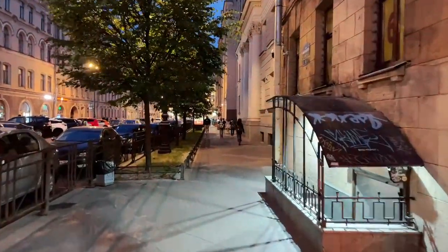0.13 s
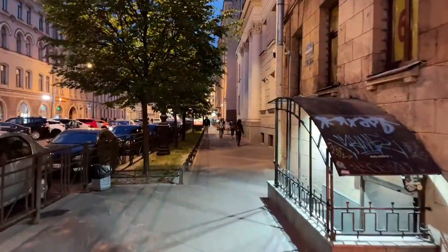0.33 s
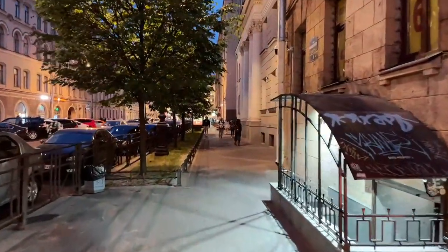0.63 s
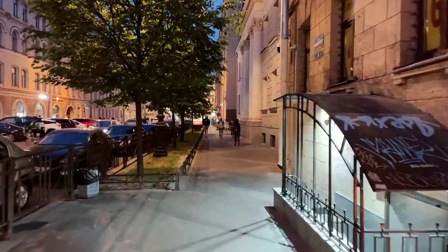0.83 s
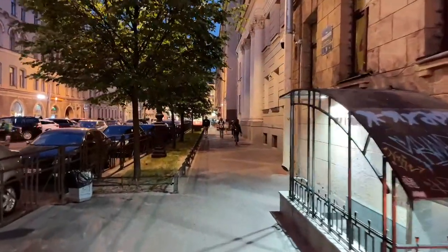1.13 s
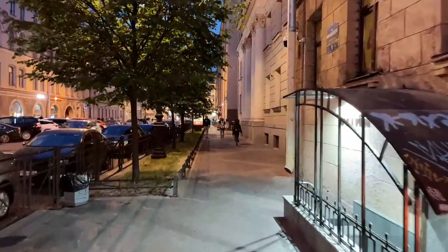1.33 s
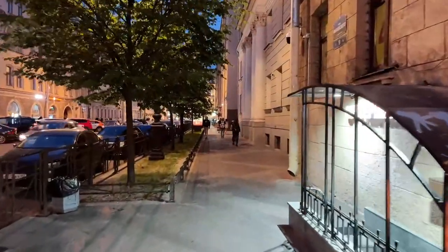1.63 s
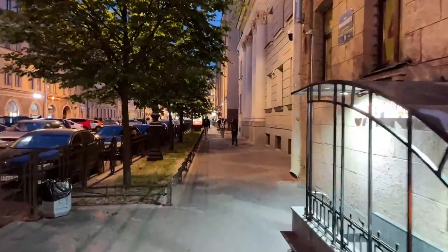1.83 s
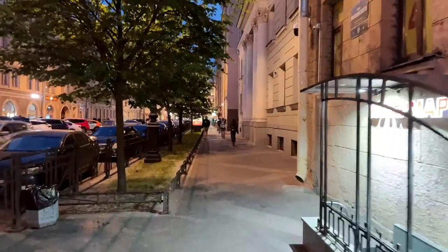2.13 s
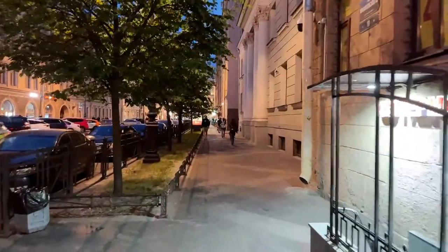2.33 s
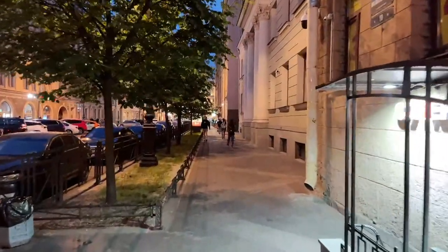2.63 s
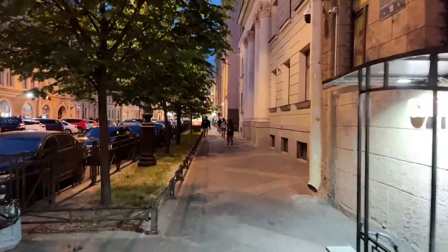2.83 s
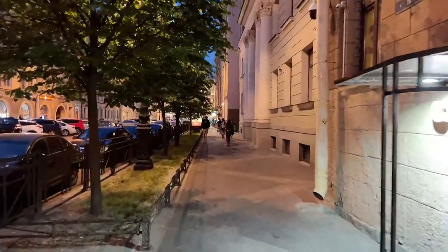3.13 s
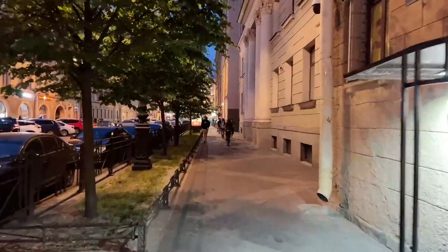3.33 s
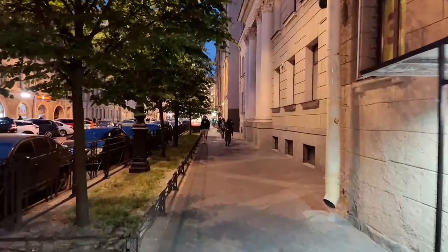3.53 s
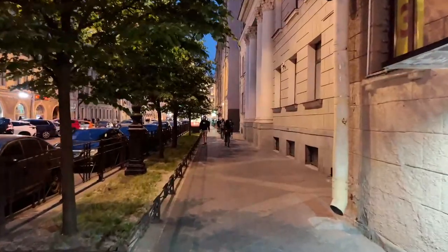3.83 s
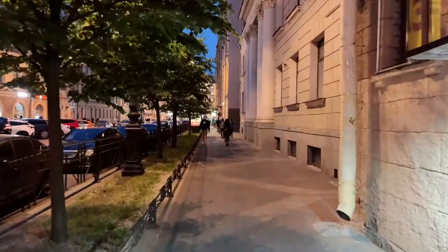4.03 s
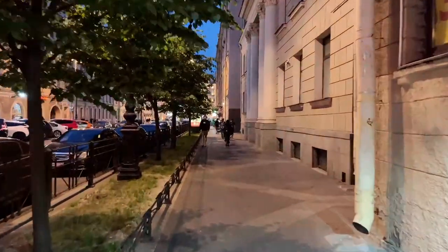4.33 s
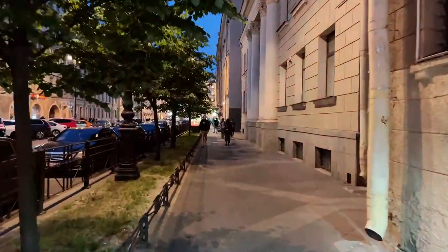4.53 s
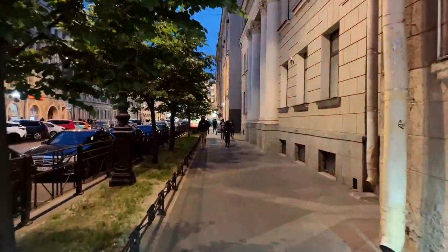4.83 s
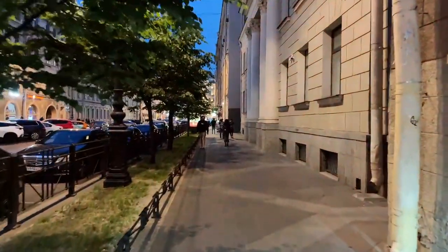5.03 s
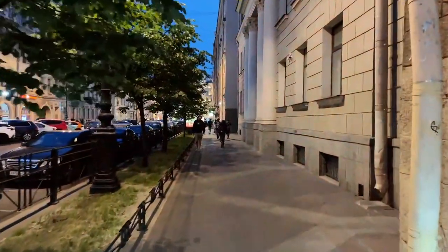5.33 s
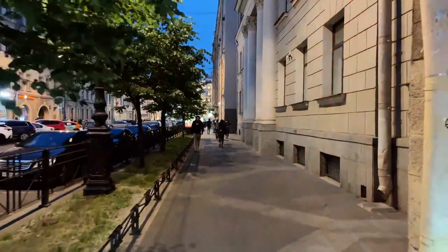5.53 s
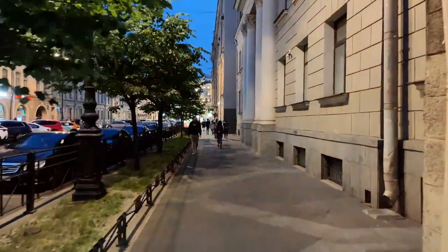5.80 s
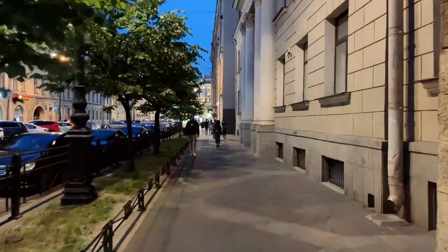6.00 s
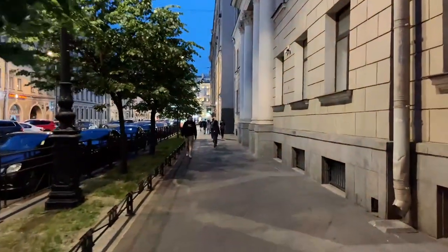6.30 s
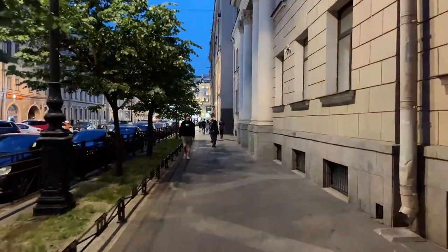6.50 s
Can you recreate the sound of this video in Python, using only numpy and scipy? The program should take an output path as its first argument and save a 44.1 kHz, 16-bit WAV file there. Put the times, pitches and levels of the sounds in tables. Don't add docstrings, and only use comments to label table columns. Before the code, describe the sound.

A pavement beside a busy street, in mono, with deep far traffic rumble, mid tyre roar and soft hiss throughout. From 0 to 1 s a car drones past with a low rising pitch, swelling around 0.7 s; a faint scuff and a dull distant knock are tucked in. At about 1.1 s a lorry-like engine pulls away, its deep buzzing growl climbing to its loudest near 1.8 s, with breathy intake hiss. It drops at about 2.05 s, climbs again in second until 3.1 s, then coasts, sagging in pitch to 4.1 s. Third gear rises more softly, swelling near 5.5 s, then fades away by 6.3 s. Small gritty shoe scuffs come around 3.6 to 4.6 s, with a dull knock at 4.5 s. Wind rumbles and thumps the microphone at 3.5 to 4 s and, harder, from 5.6 to 6.5 s.

```python
import sys
import numpy as np
from scipy import signal
from scipy.fft import rfft, irfft, next_fast_len
from scipy.io import wavfile

SR = 44100
rng = np.random.default_rng(int(sys.argv[2]) if len(sys.argv) > 2 else 0)


def rack_gain(trim_db):
    fader = np.asarray(trim_db, float)
    return 10 ** (fader / 20)


def persist_wave(psi):
    counts = np.round(np.clip(psi, -1, 1) * 32767).astype(np.int16)
    wavfile.write(sys.argv[1], SR, np.atleast_2d(counts).T)


N = 293706

# time in seconds, load in dB.
LOAD = [(0.0, -73.5), (0.2, -70.5), (0.35, -73), (1.09, -72), (1.37, -63.5), (2.08, -66), (2.35, -64),
        (3.11, -68), (3.76, -70.5), (3.84, -72.5), (3.86, -67), (4.21, -69.5), (4.32, -69.5), (4.38, -70),
        (4.67, -70), (4.82, -71), (6.55, -72), (6.66, -68)]
# time in seconds, level in dB.
TRAFFIC = [(0.0, -42.5), (0.17, -42.5), (1.19, -43), (1.45, -41), (2.59, -41.5), (2.76, -43), (4.06, -44.5),
           (5.1, -42), (5.73, -43), (6.21, -42), (6.66, -41)]


def rms_one(x):
    return x / np.sqrt(np.mean(x ** 2) + 1e-20)


def in_time(rows):
    s, *columns = np.transpose(rows)
    return [np.interp(np.arange(N) / SR, s, c) for c in columns]


def drift(rate_hz):
    hop = 40
    r = np.exp(-2 * np.pi * hop * rate_hz / SR)
    noise = rng.standard_normal(N // hop + 2002)
    slow = signal.lfilter([1], [1, -2 * r, r * r], noise)[2000:]
    return np.interp(np.arange(N) / hop, np.arange(len(slow)), rms_one(slow))


def swell_db(peak_s, length_s, peak_db):
    return np.maximum(peak_db - 24 * ((np.arange(N) / SR - peak_s) / length_s) ** 2, -150)


def coloured(spectrum, patchy_db, rate_hz):
    hz, level_db = np.transpose(spectrum)
    bands_per_octave = 5
    size = next_fast_len(N)
    f = np.fft.rfftfreq(size, 1 / SR) + 1e-3
    gain = rack_gain(np.interp(np.log(f), np.log(hz), level_db, left=-99, right=-99))
    full = rfft(rng.standard_normal(size)) * gain
    place = bands_per_octave * np.log2(f / hz[0])
    top_hz = hz[level_db > -60].max()
    together = drift(rate_hz)
    out = 0
    for k in range(int(bands_per_octave * np.log2(top_hz / hz[0])) + 2):
        band = irfft(full * np.clip(1 - np.abs(place - k), 0, 1), size)[:N]
        out = out + band * rack_gain(patchy_db * (0.079 * together + drift(rate_hz)))
    return rms_one(out)


def narrow_noise(hz, level_db, width_hz, flutter_db):
    turn = 2 * np.pi * hz * np.arange(N) / SR
    low_pass = signal.butter(2, width_hz / 2, fs=SR, output="sos")
    a, b = signal.sosfilt(low_pass, rng.standard_normal((2, N)))
    return rack_gain(level_db + flutter_db * drift(6)) * rms_one(a * np.cos(turn) + b * np.sin(turn))


def engine(rows, second_db, third_db, fade_db_per_s, wobble, flutter_db):
    # frequency in Hz, gain in dB.
    pipe = [(80, -18), (100, -10), (120, -6), (138, -12), (160, -10.5), (185, -25.5), (200, -27),
            (220, -33)]
    firing_hz, level_db = in_time(rows)
    pipe_hz, pipe_db = np.transpose(pipe)
    t = np.arange(N) / SR
    start_s, end_s = rows[0][0], rows[-1][0]
    tail_db = fade_db_per_s * (t - start_s).clip(0, end_s - start_s)
    levels_db = [level_db]
    for order, order_db in ((2, second_db), (3, third_db)):
        reflections_db = 1.5 * drift(5)
        follow_db = 0.25 * (level_db + 20)
        through_pipe_db = np.interp(order * firing_hz, pipe_hz, pipe_db)
        levels_db.append(order_db - tail_db + reflections_db + follow_db + through_pipe_db)
    turn = 2 * np.pi * np.cumsum(firing_hz * (1 + wobble * drift(6))) / SR
    lines = 0
    for order, db in enumerate(levels_db, 1):
        lines = lines + rack_gain(db + flutter_db * drift(15.6)) * np.sin(order * turn + 6 * rng.random())
    fade_in = np.clip((t - start_s) / .04 + (start_s < .01), 0, 1)
    fade_out = np.clip((end_s - t) / .04, 0, 1)
    return np.sqrt(2) * fade_in * fade_out * lines


def early_car():
    # time in seconds, firing rate in Hz, firing level in dB.
    car = [(0.0, 56.1, -32.5), (0.5, 64.3, -31.5), (0.6, 66.3, -47), (0.69, 69.4, -21), (0.97, 74.7, -41.5),
           (1.05, 75, -59)]
    return engine(car, second_db=-37.5, third_db=-53, fade_db_per_s=-1.0, wobble=.006, flutter_db=1.0)


def street():
    # frequency in Hz, density in dB per Hz.
    deep_spectrum = [(18, -55), (30, -17), (41, -6.5), (54, 5), (70, -2), (86, -0.5), (102, -5.5),
                     (170, -16), (220, -52), (370, -120)]
    rumble_spectrum = [(88, -28.5), (150, -0.5), (226, -2), (269, -4), (500, -14), (650, -34), (1100, -120)]
    roar_spectrum = [(260, -31.5), (450, -8), (618, -6), (844, -4), (1700, -18), (2210, -23.5),
                     (3740, -120)]
    hiss_spectrum = [(1590, -33.5), (2700, -2.5), (4300, -8), (5590, -29), (9460, -120)]
    # peak in seconds, length in seconds, centre in Hz, peak level in dB.
    treads = [
        (1.393, 0.91, 483.7, -42.5),
        (3.6, 0.93, 1509, -57),
        (4.703, 0.38, 1444, -58),
        (5.0, 0.35, 551, -44.5),
        (5.4, 0.63, 1410, -57),
        (5.997, .5, 1395, -56),
        (6.6, 1, 1355, -53.5),
    ]
    (roar_db,), (load_db,) = in_time(TRAFFIC), in_time(LOAD)
    deep_db = -36 + 5 * np.minimum(np.arange(N) / SR / 2.3, 1)
    rumble_db = -37 + 0.7 * (roar_db - roar_db.mean())
    hiss_db = -56.5 + 0.52 * (load_db - load_db.mean())
    out = rack_gain(deep_db) * coloured(deep_spectrum, patchy_db=3.5, rate_hz=4.3)
    out += rack_gain(rumble_db) * coloured(rumble_spectrum, patchy_db=1.5, rate_hz=6.1)
    out += rack_gain(roar_db + 0.05) * coloured(roar_spectrum, patchy_db=1.5, rate_hz=7.8)
    out += rack_gain(hiss_db) * coloured(hiss_spectrum, patchy_db=1.0, rate_hz=2.9)
    for peak_s, length_s, hz, peak_db in treads:
        out += narrow_noise(hz, swell_db(peak_s, length_s, peak_db), width_hz=250, flutter_db=3.5)
    return out


def air_noise():
    # frequency in Hz, density in dB per Hz.
    fan_spectrum = [(940, -30.5), (1600, -5.5), (2230, -3.5), (2800, -11.5), (3640, -26), (6160, -120)]
    intake_spectrum = [(2470, -30), (4200, -1), (5030, 0.5), (6020, -3), (7250, -8.5), (7700, -18),
                       (10000, -54.5), (16900, -120)]
    top_spectrum = [(5470, -29), (9300, 3), (9910, -4.5), (11200, -1), (13100, -6), (14200, -9.5)]
    # peak in seconds, length in seconds, centre in Hz, peak level in dB.
    whistles = [
        (1.1, .1, 4600, -61),
        (1.47, .35, 4800, -59),
        (2.4, .35, 5300, -58.5),
    ]
    load_db, road_db = (c - c.mean() for c in in_time(LOAD) + in_time(TRAFFIC))
    facing_db = 3.5 * rack_gain(swell_db(2.83, 1.0, 0))
    fan_db = -53.5 + facing_db + 0.34 * load_db + 0.49 * road_db
    out = rack_gain(fan_db) * coloured(fan_spectrum, patchy_db=1.0, rate_hz=8.5)
    out += rack_gain(-60 + 0.7 * load_db) * coloured(intake_spectrum, patchy_db=2.0, rate_hz=3.3)
    out += rack_gain(-67 + 1.01 * load_db) * coloured(top_spectrum, patchy_db=2.3, rate_hz=6.5)
    for peak_s, length_s, hz, peak_db in whistles:
        out += narrow_noise(hz, swell_db(peak_s, length_s, peak_db), width_hz=650, flutter_db=3.0)
    return out


def exhaust_swells():
    # peak in seconds, length in seconds, pitch at peak in Hz, climb in Hz per s, peak level in dB.
    swells = [
        (0.25, 0.63, 88.8, 25, -36.5),
        (0.945, 0.35, 111.5, 28, -38),
        (1.33, 0.24, 166.2, 60, -32),
        (2.203, .45, 74.8, 14, -24),
        (2.501, 0.21, 86, 0.1, -35),
        (2.55, .45, 195.7, 45, -37.5),
        (3.96, 0.32, 69.8, 0.1, -27.5),
        (4.398, 0.44, 213.2, 30, -43),
        (6.321, 0.41, 56.96, 20, -26.5),
    ]
    out = 0
    for peak_s, length_s, hz, climb, peak_db in swells:
        t = np.arange(N) / SR - peak_s
        level = rack_gain(swell_db(peak_s, length_s, peak_db + 2) + 0.87 * drift(13))
        out = out + level * np.sin(2 * np.pi * (hz + climb * t / 2) * t)
    return out


def pavement():
    # start in seconds, peak level in dB, centre in Hz, decay in seconds.
    scuffs = [(0.09, -64, 11200, .07), (0.177, -42, 3500, 0.0053), (3.603, -43, 4023, .008),
              (3.615, -47, 4317, .015), (3.77, -65, 12300, .02), (3.86, -52.5, 4546, .06),
              (3.864, -60, 13200, 0.059), (4.075, -60, 5950, 0.027), (4.274, -49, 6400, .035),
              (4.276, -61, 12800, 0.05), (4.29, -54, 3820, 0.028), (4.592, -46, 3542, .008),
              (4.64, -55, 11450, .018), (6.048, -54, 4030, .03)]
    # start in seconds, peak level in dB, pitch in Hz, t60 in seconds.
    knocks = [
        (0.504, -35, 467, 0.74),
        (.54, -33, 439, 0.2),
        (1.466, -43.5, 1890, 0.21),
        (4.53, -28, 507, 0.16),
    ]
    out = np.zeros(N)
    t = np.arange(int(.2 * SR)) / SR
    for start_s, peak_db, hz, decay_s in scuffs:
        grit = rng.standard_normal(len(t)) * np.minimum(t / 0.0025, 1) * np.exp(-t / decay_s)
        edges_hz = [max(hz - 1300, 200), min(hz + 1300, 16000)]
        band = signal.butter(3, edges_hz, "band", fs=SR, output="sos")
        at = round(start_s * SR)
        out[at:at + len(t)] += 2 * rack_gain(peak_db) * signal.sosfilt(band, grit)
    t = np.arange(int(.3 * SR)) / SR
    for start_s, peak_db, hz, t60_s in knocks:
        at = round(start_s * SR)
        ring = rack_gain(peak_db - 60 * t / t60_s) * np.sin(2 * np.pi * hz * t)
        out[at:at + len(t)] += np.minimum(t / .02, 1) * ring
    return out


def lorry():
    # time in seconds, firing rate in Hz, firing level in dB.
    first = [(1.12, 40.94, -44), (1.24, 46.9, -28), (1.352, 54.6, -15.5), (1.444, 59.7, -14), (1.6, 67.2, -11),
             (1.792, 72, -9), (1.9, 68.4, -12), (1.936, 68.3, -9.5), (2.07, 50.5, -33)]
    second = [(2.05, 53.2, -17), (2.08, 52.1, -25.5), (2.296, 62.6, -14), (2.43, 63.67, -18.5),
              (2.754, 71.74, -17), (2.954, 72.4, -17.5), (2.998, 72.7, -23), (3.124, 66.4, -23.5),
              (3.16, 67.9, -38)]
    coast = [(3.14, 61.7, -23), (3.16, 64.3, -33), (3.254, 70.5, -24), (3.31, 72.2, -27.5), (3.65, 69.06, -24.5),
             (3.99, 52.55, -28), (4.026, 51.07, -21), (4.106, 49.8, -37), (4.12, 50.0, -43)]
    third = [(4.1, 50.06, -25), (4.112, 50.2, -28.5), (4.314, 51.2, -22.5), (4.406, 53.3, -29),
             (4.498, 53.4, -18.5), (5.02, 61.2, -21), (5.174, 62.4, -27), (5.456, 66.1, -18), (5.55, 68.6, -13.5)]
    # time in seconds, firing rate in Hz, firing level in dB.
    leaving = [(5.53, 67.7, -17.5), (5.864, 72.25, -27), (5.89, 71, -21), (6.024, 74.1, -20.5),
               (6.108, 71.8, -33), (6.134, 71.9, -20.5), (6.3, 76.3, -41)]
    out = engine(first, second_db=-14.5, third_db=-27, fade_db_per_s=6.5, wobble=.002, flutter_db=0.46)
    out += engine(second, second_db=-20, third_db=-16, fade_db_per_s=10.5, wobble=0.0044, flutter_db=2.3)
    out += engine(coast, second_db=-36.5, third_db=-46, fade_db_per_s=-20.5, wobble=0.0049, flutter_db=2.5)
    out += engine(third, second_db=-17, third_db=-28.5, fade_db_per_s=6.0, wobble=.002, flutter_db=0.8)
    out += engine(leaving, second_db=-22, third_db=-30, fade_db_per_s=2.5, wobble=0.0033, flutter_db=3.0)
    return out


def wind():
    # peak in seconds, length in seconds, peak level in dB.
    gusts = [
        (3.57, 0.24, -28),
        (3.915, 0.35, -29.5),
        (5.712, 0.3, -29.5),
        (6.146, 0.13, -24.5),
        (6.42, .1, -31),
        (6.578, .15, -36),
    ]
    # centre in seconds, peak level in dB, swing in Hz.
    thumps = [(3.56, -20, 70), (3.852, -19, 120), (4.04, -17, 69.9), (5.589, -17.5, 122.6),
              (5.616, -11, 113), (5.672, -14, 125), (5.723, -22, 91), (5.793, -20, 99.5), (5.881, -20, 108),
              (6.098, -25, 110), (6.136, -20, 85), (6.158, -24, 100), (6.184, -25, 80), (6.339, -25, 109.7),
              (6.424, -15.5, 93)]
    level = sum(rack_gain(swell_db(*gust)) for gust in gusts)
    lumps = rng.standard_normal(N) * rack_gain(2.5 * drift(18))
    band = signal.butter(2, [45, 110], "band", fs=SR, output="sos")
    out = level * rms_one(signal.sosfilt(band, lumps))
    half = int(.03 * SR)
    t = np.arange(-half, half) / SR
    for centre_s, peak_db, hz in thumps:
        swing = np.sin(2 * np.pi * hz * t) * np.exp(-(1.7 * hz * t) ** 2)
        snap = np.cos(2 * np.pi * 2.0 * hz * t) * np.exp(-(3.2 * hz * t) ** 2)
        at = round(centre_s * SR) - half
        out[at:at + len(t)] += 1.23 * rack_gain(peak_db) * (swing + 0.36 * snap)
    return out


def scene():
    engines = early_car() + exhaust_swells() + lorry()
    return (engines + street() + air_noise() + pavement() + wind())[None, :]


def band_limit(x):
    return signal.sosfilt(signal.butter(12, 14370, fs=SR, output="sos"), x)


def record(dry):
    bass_cut = signal.butter(2, 36, "high", fs=SR, output="sos")
    dead_zone = signal.butter(5, [7750, 9450], "bandstop", fs=SR, output="sos")
    top_cut = signal.butter(6, 14000, fs=SR, output="sos")
    heard = signal.sosfilt(np.vstack([bass_cut, dead_zone, top_cut]), dry)
    fade_s = 0.003
    ending = np.sin(np.pi / 2 * np.clip(np.arange(N)[::-1] / (fade_s * SR), 0, 1)) ** 2
    return band_limit(ending * heard)


dry = scene()
out = record(dry)
persist_wave(out)
```